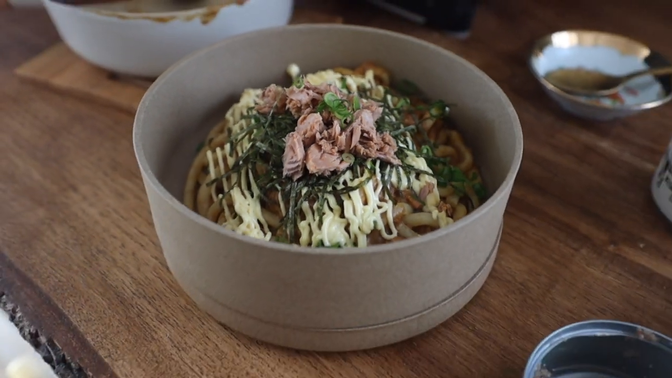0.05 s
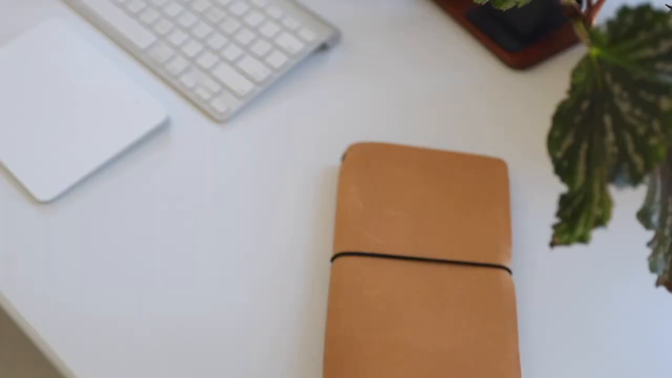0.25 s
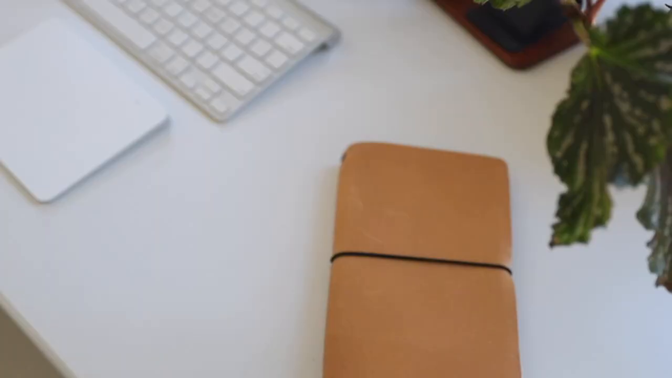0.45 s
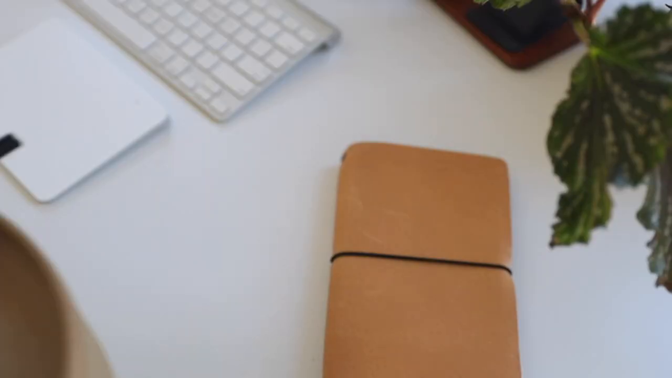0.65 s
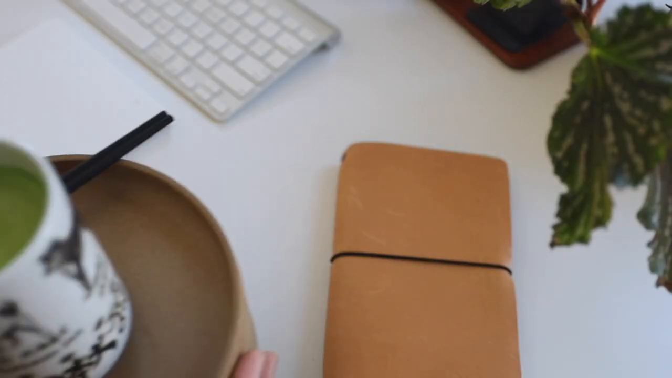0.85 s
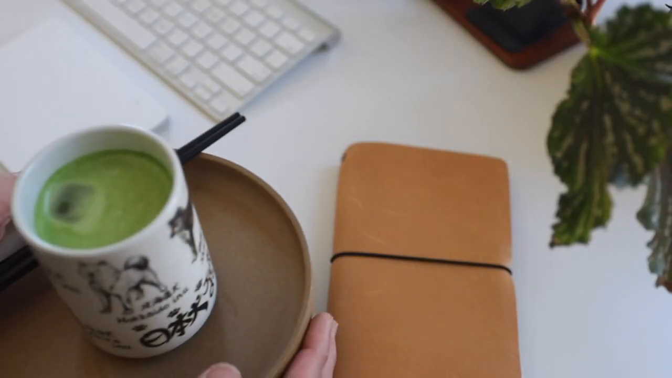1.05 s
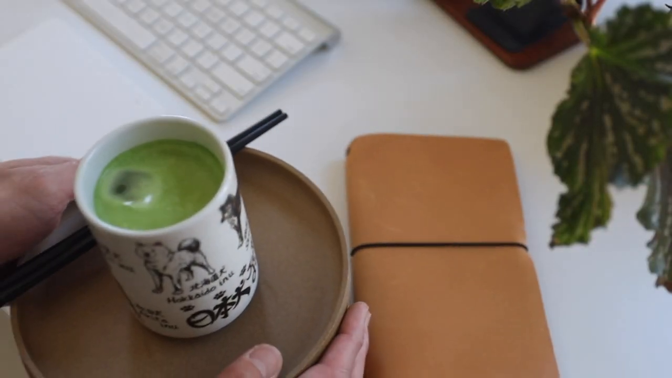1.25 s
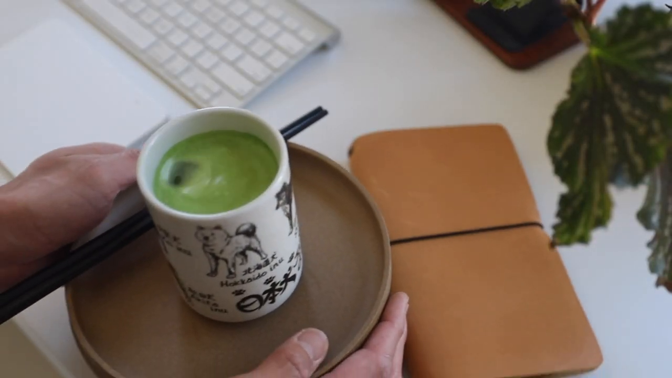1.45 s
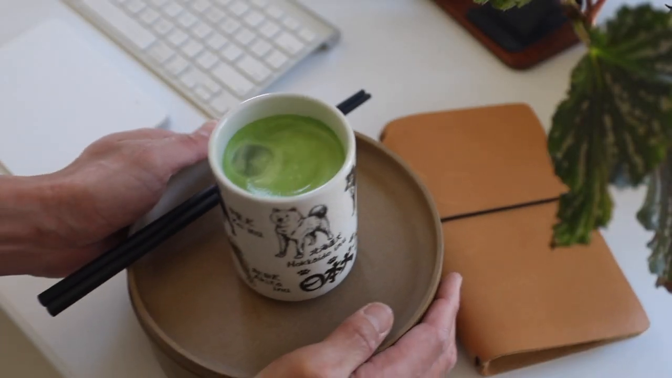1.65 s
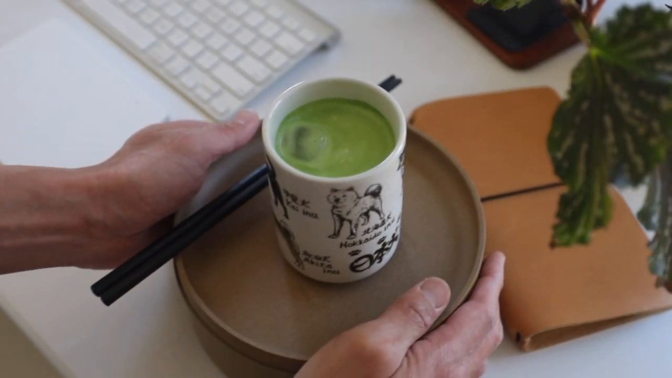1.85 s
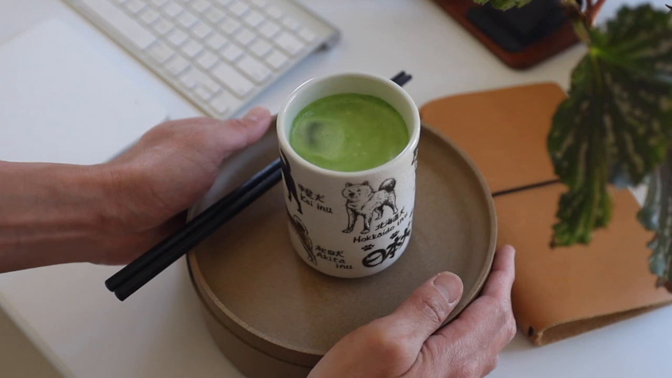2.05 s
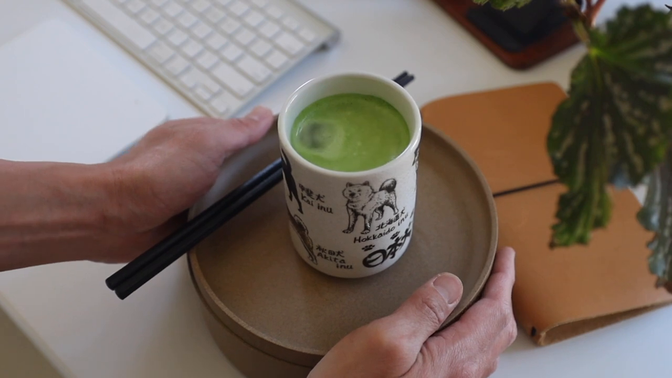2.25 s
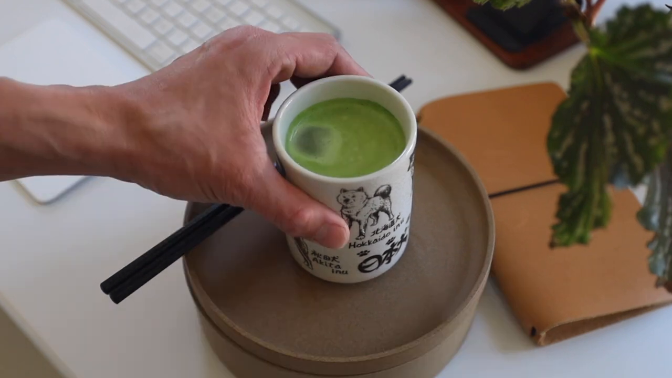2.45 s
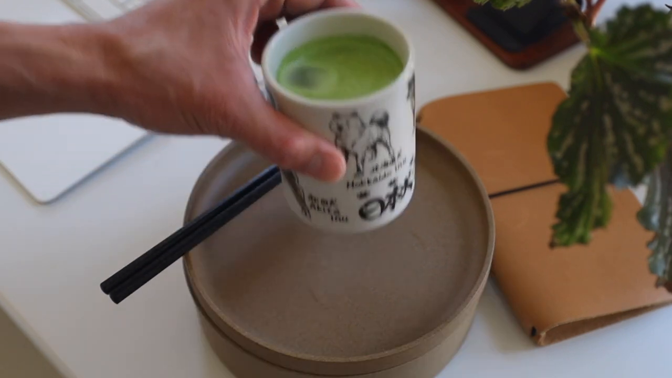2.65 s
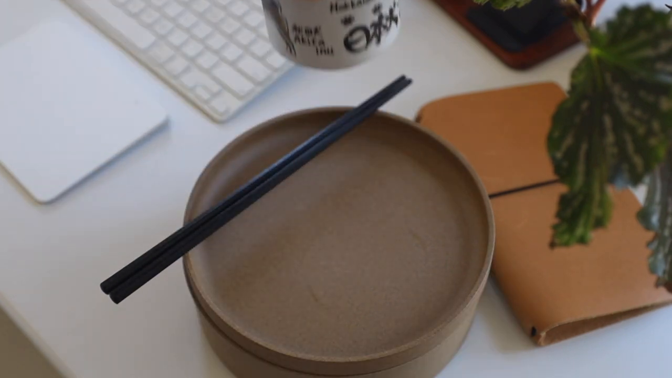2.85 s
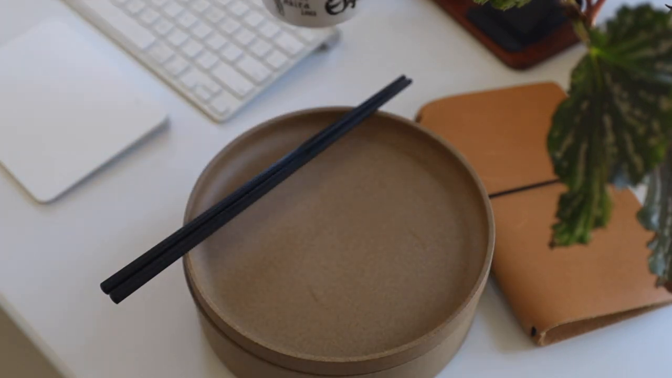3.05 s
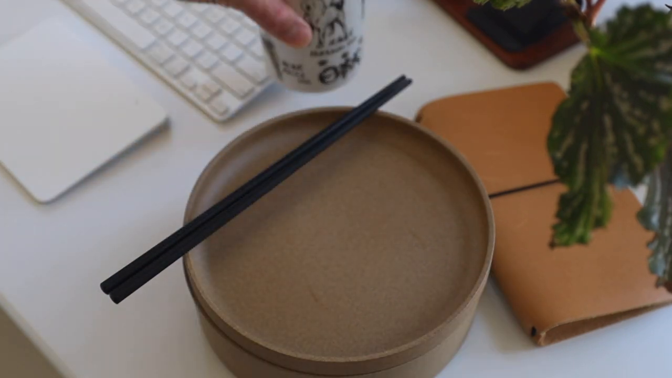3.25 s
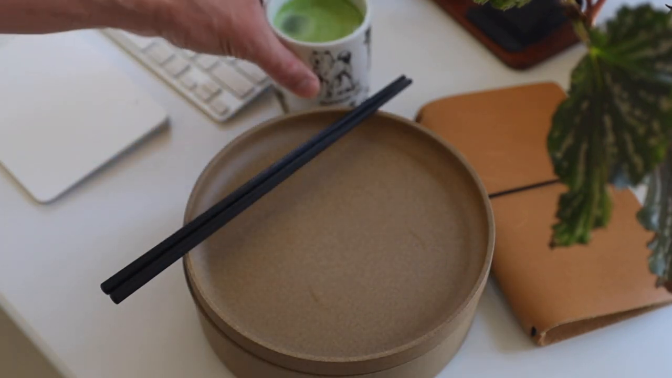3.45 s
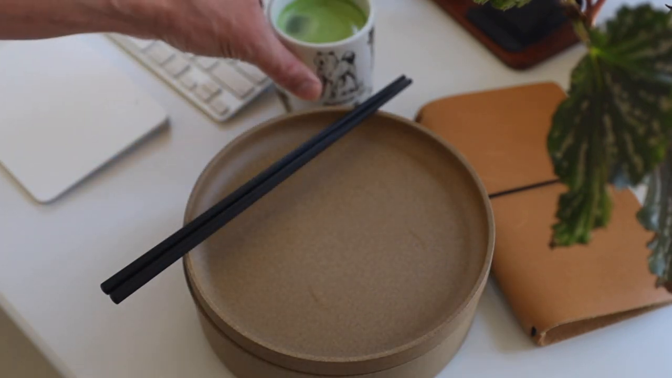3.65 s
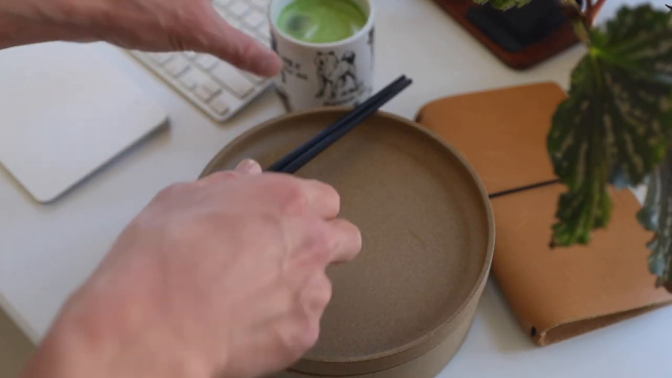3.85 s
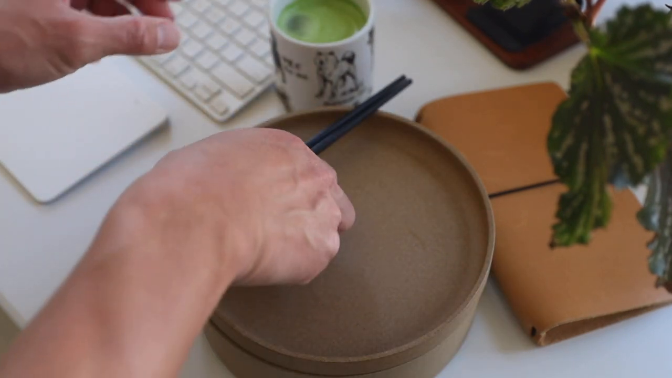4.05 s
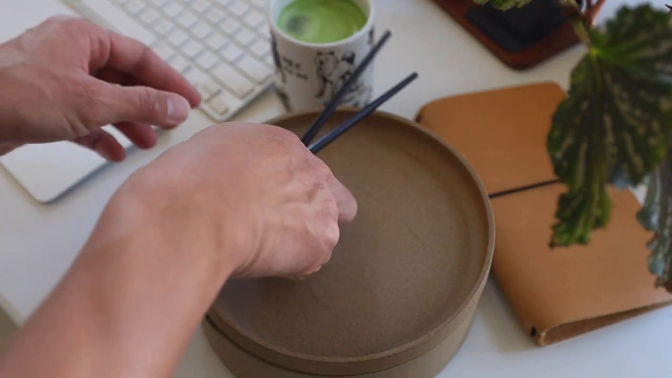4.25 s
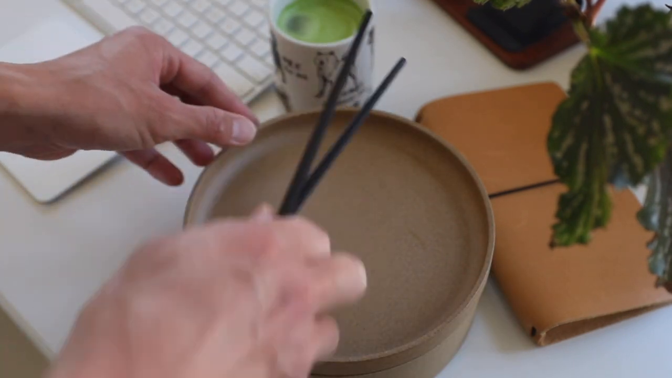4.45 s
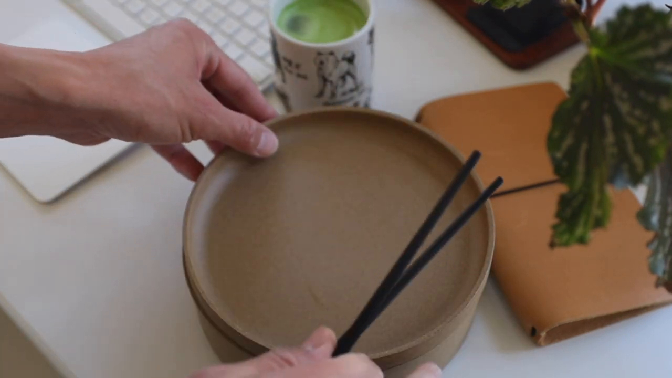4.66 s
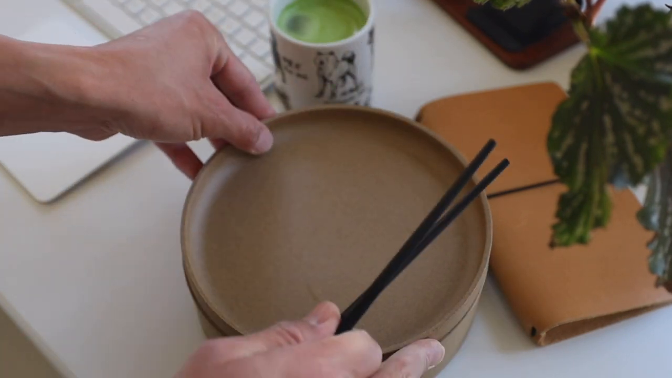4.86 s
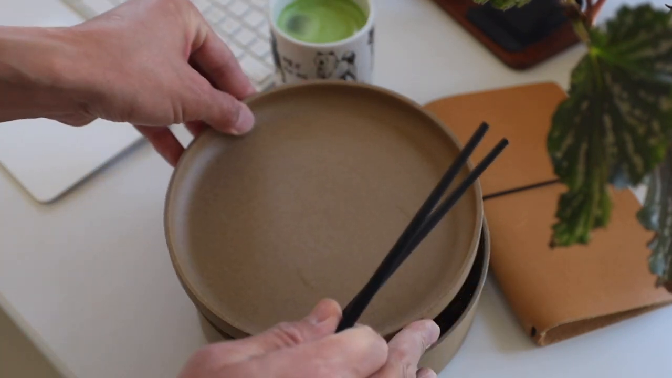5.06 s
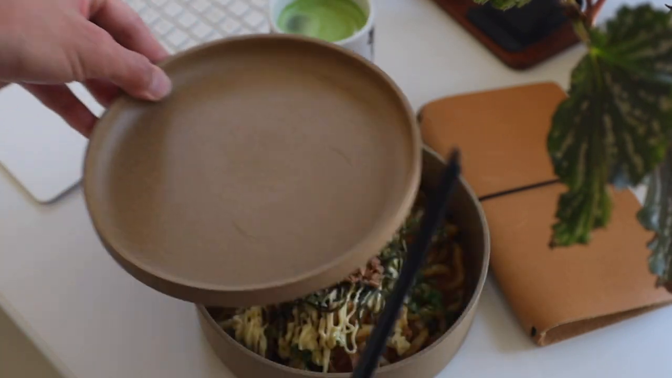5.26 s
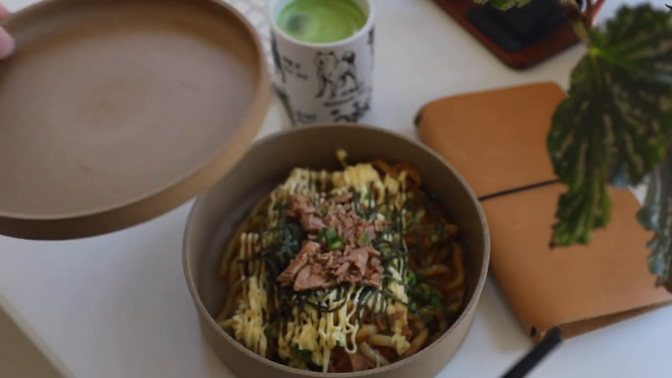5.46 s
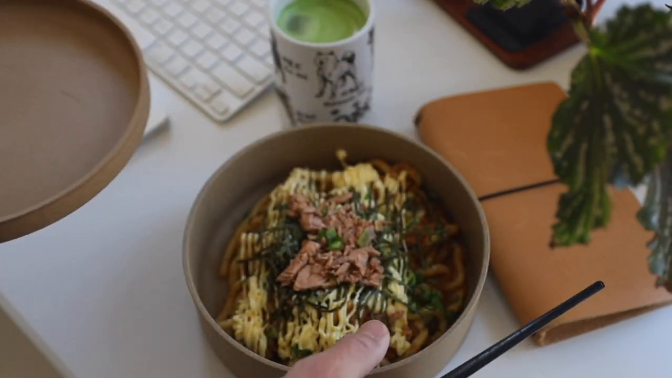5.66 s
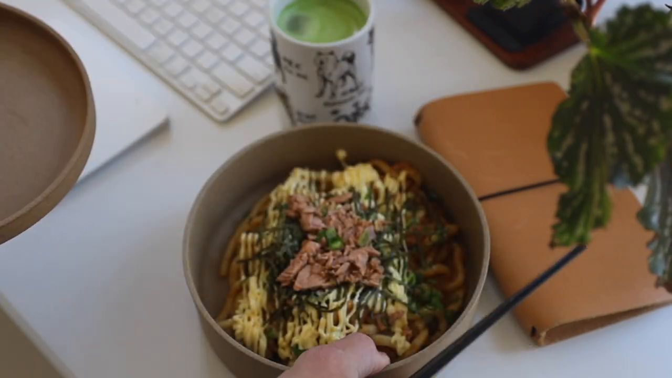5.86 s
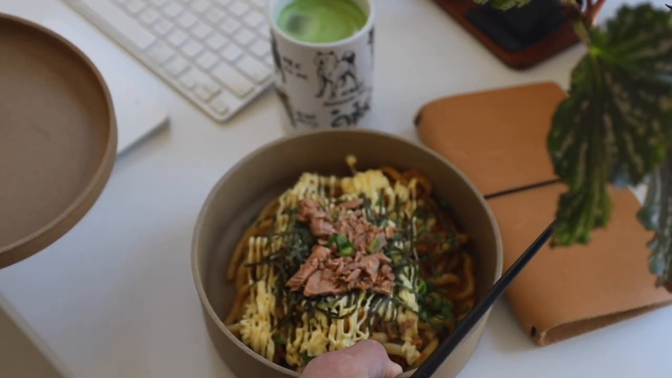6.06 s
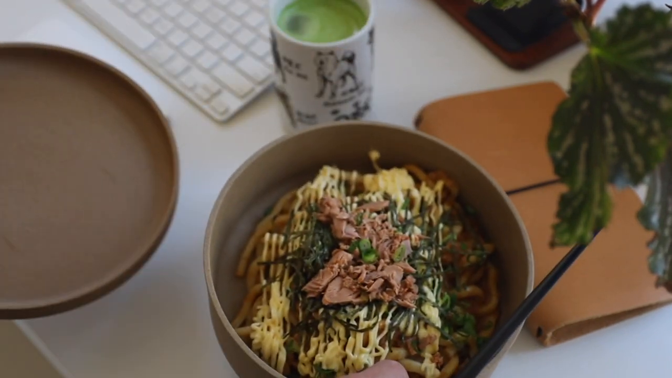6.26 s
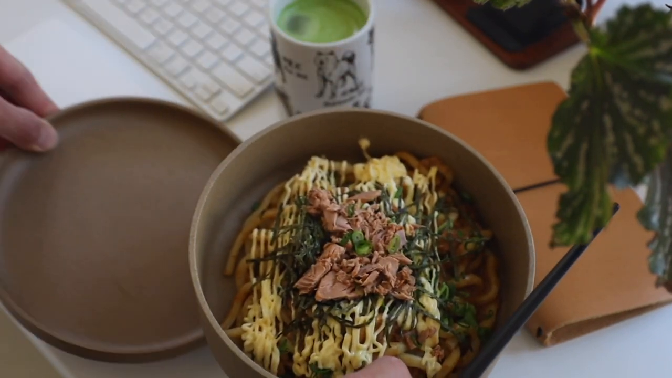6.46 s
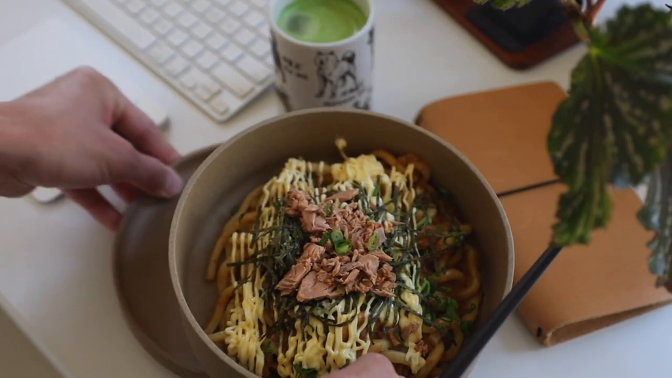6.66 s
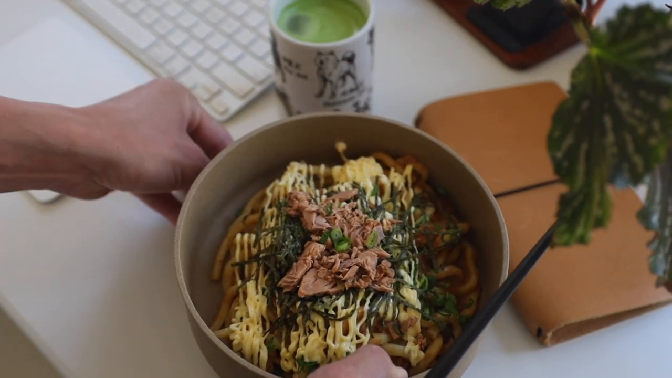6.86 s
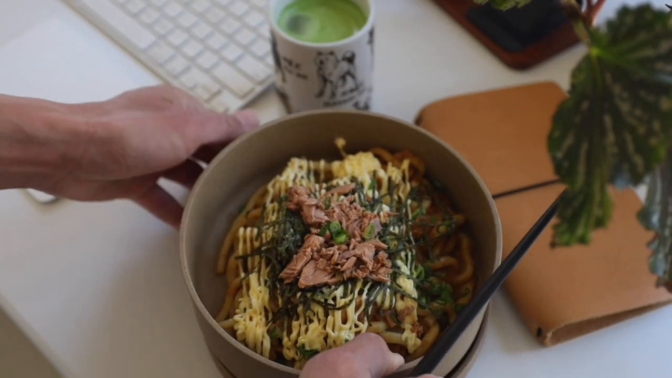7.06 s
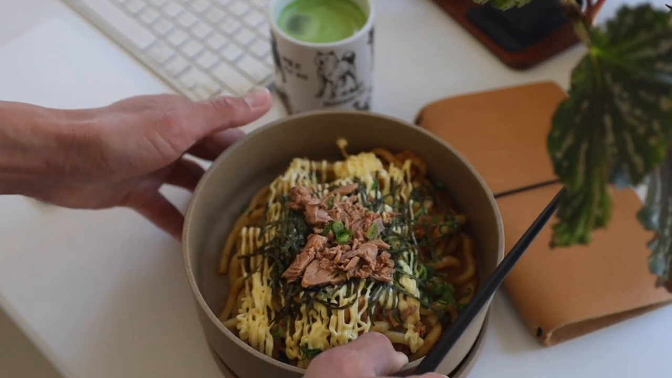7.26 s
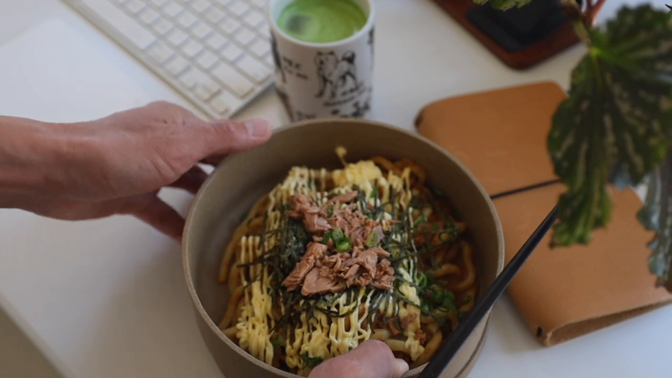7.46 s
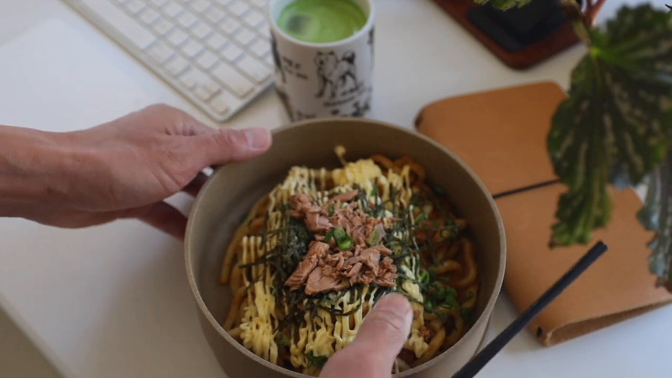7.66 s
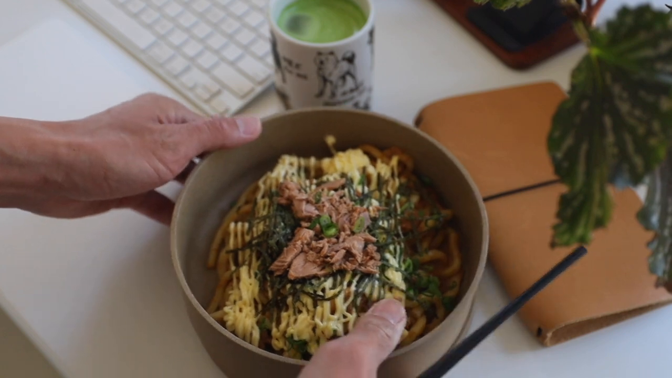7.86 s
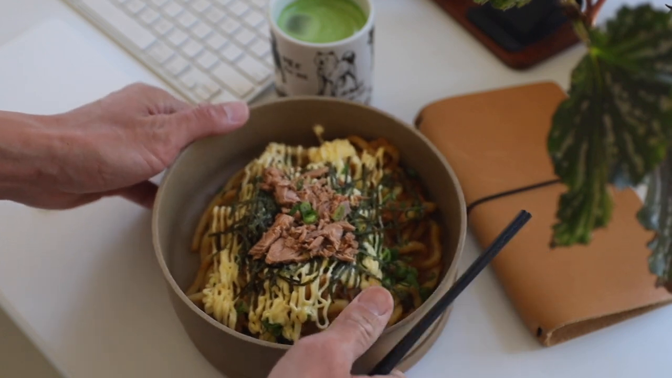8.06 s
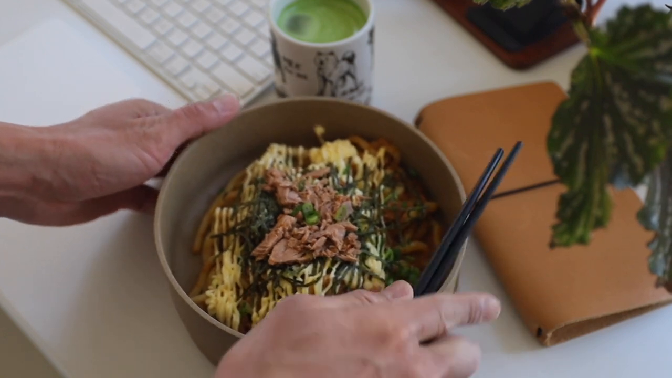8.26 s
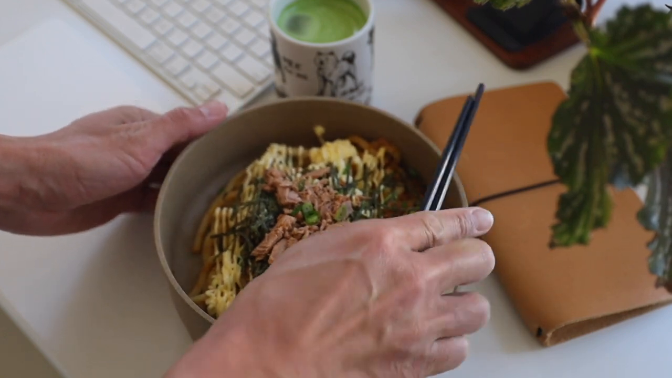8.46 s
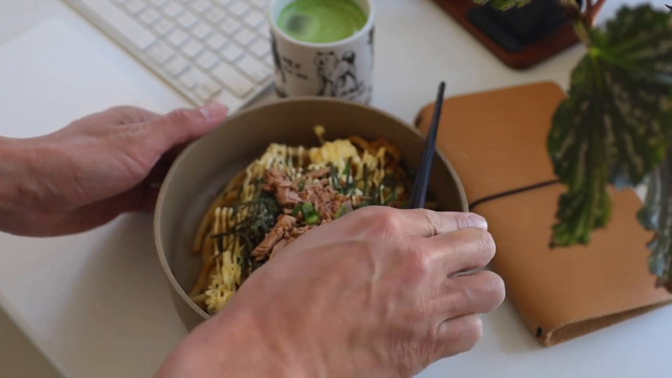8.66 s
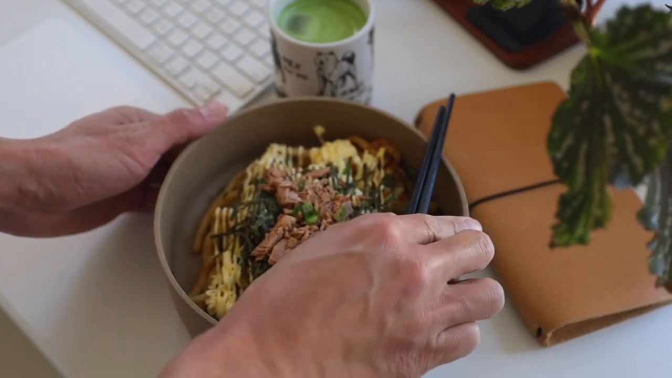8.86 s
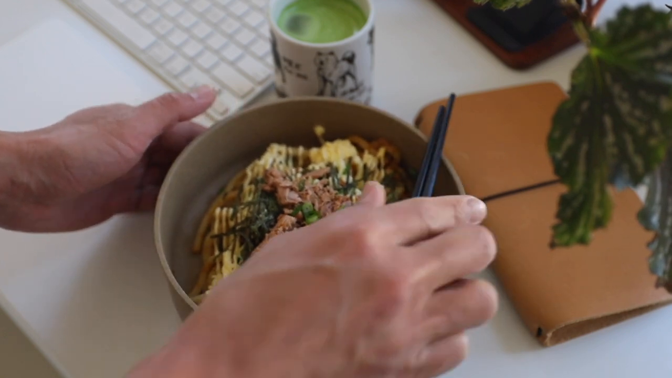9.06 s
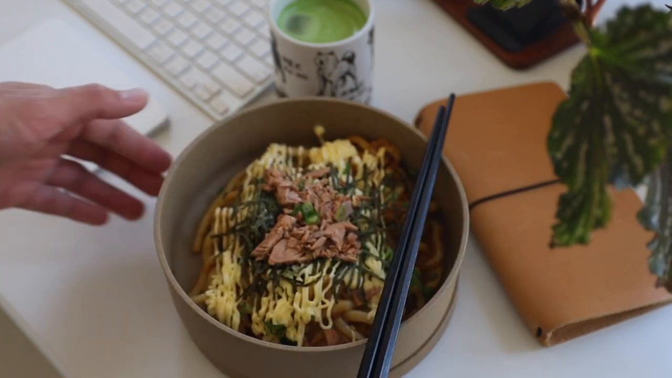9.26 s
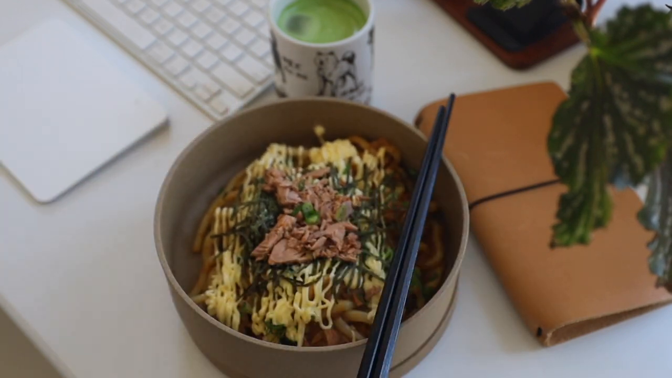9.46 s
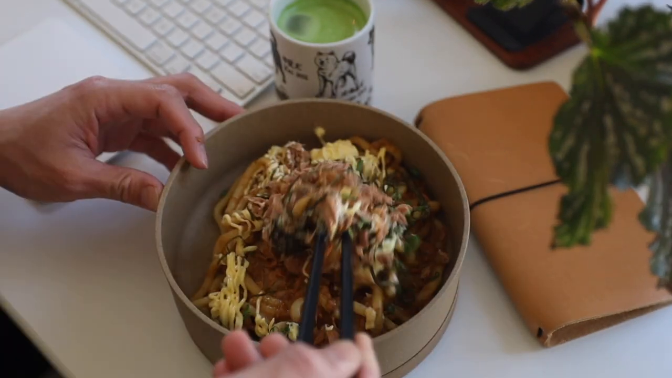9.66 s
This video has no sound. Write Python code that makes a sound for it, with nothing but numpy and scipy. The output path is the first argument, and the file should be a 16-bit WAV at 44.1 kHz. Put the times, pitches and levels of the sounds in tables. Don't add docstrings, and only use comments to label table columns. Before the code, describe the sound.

Close dull knocks and drags of a stoneware box, cup and lid on a desk, with bright chopstick taps and faint sticky ticks over soft fan air.

```python
import sys
import numpy as np
from scipy import signal
from scipy.fft import rfft, irfft, next_fast_len
from scipy.io import wavfile
from scipy.ndimage import uniform_filter1d

SR = 44100
rng = np.random.default_rng(int(sys.argv[2]) if len(sys.argv) > 2 else 0)


def amplitude_ratio(level_db):
    exponent = np.asarray(level_db, float) / 20
    return 10 ** exponent


def to_wav(sig):
    pcm = np.clip(np.atleast_2d(sig), -1, 1) * 32767
    pcm = np.round(pcm).astype(np.int16)
    wavfile.write(sys.argv[1], SR, pcm.T)


N = 427769


def evened(x):
    return x / np.sqrt(np.mean(x ** 2) + 1e-20)


def read(points, hz):
    f, value = np.transpose(points)
    return np.interp(np.log(hz + 1), np.log(f + 1), value)


def add(mix, s, sound):
    part = mix[round(s * SR):][:len(sound)]
    part += sound[:len(part)]


def coloured(x, spectrum):
    size = next_fast_len(len(x))
    gain = amplitude_ratio(read(spectrum, np.fft.rfftfreq(size, 1 / SR)))
    return evened(irfft(rfft(x, size) * gain, size)[:len(x)])


def resonate(x, hz, width_hz):
    turn = np.exp(2j * np.pi * np.cumsum(hz * np.ones(len(x))) / SR)
    r = np.exp(-np.pi * width_hz / SR)
    return 2 * (turn * signal.lfilter([1 - r], [1, -r], x / turn + 1e-18)).real


def ring(modes, favoured_hz, slope_db, sharp):
    hz, width_hz, db = np.transpose(modes)[:, :, None]
    t = np.arange(5000) / SR
    off_pitch = np.sqrt(abs(np.log2(hz / favoured_hz)))
    db = db - slope_db * off_pitch + .8 * rng.standard_normal(db.shape)
    decay = np.exp(-np.pi * width_hz / sharp * t)
    sound = (amplitude_ratio(db) * decay * np.sin(2 * np.pi * hz * t)).sum(0)
    return sound / abs(sound).max()


def grit(count, lump_db, lump_s, slips_per_s, slip):
    lumps = evened(uniform_filter1d(rng.standard_normal(count), max(round(lump_s * SR), 1)))
    size = np.minimum(rng.exponential(slip, count), 2 * slip)
    slips = (rng.random(count) < slips_per_s / SR) * size
    return (1 + slips) * rng.standard_normal(count) * amplitude_ratio(lump_db * lumps)


# f/Hz, level/dB per Hz
KITCHEN_AIR = [(12, -35.5), (20, -11), (46, 1.5), (120, -12), (216, -13.5), (347, -19.5), (4180, -43),
               (8410, -41.5), (16000, -47)]
STUDY_AIR = [(12, -42), (20, -11), (68, -3.5), (182, -9.5), (485, -11.5), (660, -13.5), (718, -11.5),
             (1120, -15), (1330, -7.5), (1910, -20), (2820, -23.5), (3840, -30), (16000, -35)]
# f/Hz, width/Hz, rms level/dB
FAN = [(1345, 30, -53), (2879.1, 270.8, -61), (55.57, 19.35, -60), (4959.4, 160, -77.5)]


def rooms():
    kitchen = amplitude_ratio(-46.5) * coloured(rng.standard_normal(N), KITCHEN_AIR)
    study = amplitude_ratio(-47.5) * coloured(grit(N, lump_db=.3, lump_s=.1, slips_per_s=0, slip=0), STUDY_AIR)
    for hz, width_hz, db in FAN:
        drift = evened(uniform_filter1d(rng.standard_normal(N), round(.2 * SR)))
        whine = resonate(rng.standard_normal(N), hz * (1 + .008 * drift), width_hz)
        study += amplitude_ratio(db + 2.5 * drift) * evened(whine)
    cut_s = .29
    return np.where(np.arange(N) / SR < cut_s, kitchen, study)


# f/Hz, width/Hz, level/dB
BOX = [(283, 19, -55), (337.4, 8.2, -15), (387.76, 27, -7), (468.72, 43, -15.5), (663.23, 28, -3),
       (797.54, 197.2, 5), (991.02, 32.77, 6), (1125.6, 630, 6), (1310, 700, 10.5), (1617.8, 307.3, 13),
       (1988.9, 401.8, 11), (2222.9, 475, 9.5)]
# f/Hz, level/dB per Hz
SCRAPE = [(60, -51), (150, -18), (280, 5.5), (600, 2), (1200, 1), (2200, -10.5), (4000, -20.5),
          (8000, -87.5), (15000, -138)]
HISS = [(1060, -45), (1800, -1.5), (2300, 14), (3610, 3), (7840, -7.5), (8520, -4), (14700, -30.5),
        (16000, -10)]


def slide(rows, bodies, favoured_hz, tone, focus_db=16.5, lean_db=11):
    s, *columns = np.transpose(rows)
    t = np.arange(s[0], s[-1], 1 / SR)
    box_db, hz, hiss_db, ring_db = (np.interp(t, s, c) for c in columns)
    force = grit(len(t), lump_db=2.5, lump_s=.008, slips_per_s=300, slip=2.5)
    walls = ring(BOX, hz.mean(), slope_db=7.5, sharp=0.2981)
    hollow = evened(signal.oaconvolve(force, walls)[:len(t)])
    box = evened(coloured(force, SCRAPE) + 0.32866 * hollow + tone * evened(resonate(force, hz, 47)))
    leaning = [(f, db - lean_db * abs(np.log2(f / max(favoured_hz, 5000)))) for f, db in HISS]
    hiss = coloured(grit(len(t), lump_db=2, lump_s=.005, slips_per_s=200, slip=2.5), leaning)
    rub = evened(grit(len(t), lump_db=3, lump_s=.012, slips_per_s=80, slip=4.))
    rings = sum(amplitude_ratio(db) * ring(body, favoured_hz, slope_db=focus_db, sharp=1.0) for body, db in bodies)
    rung = signal.oaconvolve(rub, rings)[:len(t)]
    sound = amplitude_ratio(box_db - 4.5) * box + amplitude_ratio(hiss_db - 4.0) * hiss + amplitude_ratio(ring_db - 13.0) * rung
    return s[0], sound * signal.windows.tukey(len(t), .004 / (s[-1] - s[0]))


def stroke(peak_s, rise_s, hold_s, db, hard_db, hz, hiss_db, ring_db, sag_db_s, fall_db_s, **contact):
    rise_s, hold_s = max(rise_s, .003), max(hold_s, .001)
    rise_db, tail_db = 36, 47.5
    t = np.arange(-rise_s, hold_s + tail_db / fall_db_s, .002)
    swell = -rise_db * (np.minimum(t, 0) / rise_s) ** 2
    press = swell - sag_db_s * np.clip(t, 0, hold_s) - fall_db_s * np.maximum(t - hold_s, 0)
    pitch = hz * 2 ** (.02 * press)
    hiss = db + hard_db + hiss_db + 1.7378 * press
    rung = db + hard_db + ring_db + 1.3284 * press
    return slide(np.transpose([peak_s + t, db + press, pitch, hiss, rung]), **contact)


def strokes(table, **kind):
    mix = np.zeros(N)
    for row in table:
        add(mix, *stroke(*row, **kind))
    return mix


# f/Hz, width/Hz, level/dB
STICK_A = [(2630, 60, -5), (3660, 45, 0), (4850, 45, -2), (6190, 26, 0), (7720, 30, -2), (9480, 34, -3),
           (11350, 40, -8), (13400, 40, -6), (15500, 45, -11)]
# peak t/s, rise/s, hold/s, pressure level/dB, hardness/dB
CARRIES = [
    (.45, 0.14505, 0.2175, -58.5, 2),
    (.68, 0.07412, 0.2814, -47.5, 0.5),
    (1.085, .06, 0.00588, -39.5, -4.5),
]


def carries():
    return strokes(CARRIES, hz=659.4, hiss_db=2.5, ring_db=-12.5, sag_db_s=15, fall_db_s=150.5,
                   bodies=[(STICK_A, 0)], favoured_hz=5940, tone=0.1796)


# peak t/s, rise/s, hold/s, pressure level/dB, hardness/dB
JOSTLES = [
    (1.116, .008, 0.0124, -25.5, 0),
    (1.14, .02, 0.00711, -22, 0),
]


def jostles():
    return strokes(JOSTLES, hz=1850, hiss_db=-7, ring_db=-15, sag_db_s=30, fall_db_s=282.5,
                   bodies=[(STICK_A, 0)], favoured_hz=4000, tone=0.7433, focus_db=-3)


# t/s, peak level/dB, f/Hz, t60/s
BOOMS = [(1.379, -23, 354, 0.0993), (1.409, -20.5, 334.7, 0.0701), (4.812, -20, 323.7, 0.2097),
         (4.821, -17.5, 883.7, 0.1024), (4.933, -16.5, 425.5, 0.1003), (4.953, -19, 419, 0.0709),
         (4.993, -18.5, 540, 0.0716), (5.0, -24, 311.3, 0.1136), (6.785, -13.5, 381.3, 0.1368),
         (6.83, -15, 361.5, 0.1575), (6.87, -15.5, 376.3, 0.142), (6.849, -9.5, 1338, 0.06608),
         (6.768, -9, 1310, 0.07594), (8.787, -12, 900, 0.0309), (1.4985, -6.5, 1112, 0.07813),
         (1.499, -7.5, 476.6, 0.07064), (1.662, -5, 1355, 0.0342), (3.485, -7.5, 1052, 0.07613),
         (3.485, -9, 518.8, 0.0928), (6.5625, -6, 952.2, 0.06588), (6.563, -9, 399.7, 0.0997),
         (6.927, -10, 1298, 0.07186), (6.927, -10.5, 2105, 0.0559), (7.143, -8, 762.8, 0.0851),
         (7.433, -17.5, 697.8, 0.0721), (1.117, -25.5, 803.7, 0.0525), (1.136, -21.5, 750.6, 0.0708),
         (7.542, -28.5, 607.2, 0.0517), (1.582, -18.5, 697, .05)]


def booms():
    mix = np.zeros(N)
    for s, db, hz, t60 in BOOMS:
        t = np.arange(0, 1.2 * t60, 1 / SR)
        swell = np.minimum(t * hz / 1.2324, 1)
        add(mix, s, swell * amplitude_ratio(db - 60 * t / t60) * np.sin(2 * np.pi * hz * t))
    return mix


# peak t/s, rise/s, hold/s, pressure level/dB, hardness/dB
DRAGS = [
    (1.22, 0.0557, 0.1178, -35, 15.5),
    (1.346, 0.009597, 0.28, -38, 21.5),
    (1.515, 0.006111, 0.24, -11, -1.5),
    (1.655, 0.021793, 0.00451, -15, 11.5),
    (1.68, 0.0055666, 0.2327, -13.5, 0),
    (2.455, 0.05282, 0.02595, -35.5, 13),
    (6.74, .13, 0.0596, -31.5, 6.5),
    (7.46, 0.005268, 0.0104, -23, -11.5),
    (9.004, .01, 0.00494, -42.5, 19),
]


def drags():
    return strokes(DRAGS, hz=553.46, hiss_db=-21.5, ring_db=-46, sag_db_s=45.5, fall_db_s=116.5,
                   bodies=[(STICK_A, 0)], favoured_hz=5500, tone=0.1939)


def tap(s, click_db, favoured_hz, *ring_db, bodies):
    t = np.arange(5000) / SR
    burst = rng.standard_normal(len(t)) * (np.exp(-t / .0008) + .12 * np.exp(-t / .006))
    crack = np.diff(burst, prepend=0)
    for _ in range(3):
        crack = resonate(crack, favoured_hz, 0.5 * favoured_hz)
    sound = amplitude_ratio(click_db) * crack / abs(crack).max()
    for db, body in zip(ring_db, bodies):
        sound += amplitude_ratio(db + 12) * ring(body, favoured_hz, slope_db=11., sharp=.7)
    return s, sound


def taps(table, *bodies):
    mix = np.zeros(N)
    for row in table:
        levels_db = (row[-1], row[-1] - 15.5)[:len(bodies)]
        add(mix, *tap(*row[:3], *levels_db, bodies=bodies))
    return mix


# f/Hz, width/Hz, level/dB
STICK_B = [(2680, 120, -2), (3670, 65, -2), (5070, 90, 1), (6680, 42, 0), (8110, 45, -2), (8450, 60, -1),
           (10280, 120, -2), (12050, 70, -8), (12600, 75, -6), (14250, 90, -10), (14800, 120, -10)]
# t/s, click level/dB, favoured f/Hz, ring level/dB
TAPS_B = [
    (1.257, -36.5, 6680, -43),
    (4.2155, -19.5, 4983, -28),
    (4.2554, -36, 8352, -31.5),
    (8.2313, -33, 8100, -41),
    (8.292, -34, 7000, -38),
    (8.6290, -22, 2680, -27),
    (8.6732, -8.5, 2680, -18.5),
    (8.6828, -19.5, 8110, -14.5),
    (8.7674, -27, 5965, -8.5),
    (8.7951, -21.5, 6680, -18.5),
]


def taps_b():
    return taps(TAPS_B, STICK_B, STICK_A)


# f/Hz, width/Hz, level/dB
STICKS_ON_LID = [(2000, 45, 0), (3400, 40, -2), (4820, 35, -6), (5100, 35, 0), (7880, 30, 0),
                 (9600, 36, -8), (11400, 36, -14), (12700, 58, -12), (13400, 59, -11)]
# t/s, click level/dB, favoured f/Hz, ring level/dB
TAPS_ON_LID = [
    (1.3497, -38.5, 2600, -31),
    (1.3649, -33.5, 7880, -40),
    (1.411, -29.5, 3240, -40),
    (2.403, -38.5, 5100, -46.5),
    (2.4135, -30, 9000, -36),
]


def taps_on_lid():
    return taps(TAPS_ON_LID, STICKS_ON_LID)


def knock(s, db, hz, t60, push_db):
    damped = [(f, 2.2 / t60, level) for f, _, level in [*BOX, (hz, 0, 8)]]
    contact = np.hanning(round(.45 * SR / hz) + 3)
    walls = np.convolve(ring(damped, hz, slope_db=8.0, sharp=0.93), contact)
    radiated = signal.sosfilt(signal.butter(2, 210, "high", fs=SR, output="sos"), walls)
    t = np.arange(len(walls)) / SR
    push = np.sin(2 * np.pi * 55 * t) * np.exp(-t / 0.0267)
    sound = amplitude_ratio(db + 3.0) * radiated / abs(radiated).max() + amplitude_ratio(db + push_db + 3) * push
    return s + 0.0010384, sound


def blows(table, push_db):
    mix = np.zeros(N)
    for row in table:
        add(mix, *knock(*row, push_db))
    return mix


# t/s, peak level/dB, f/Hz, t60/s
KNOCKS = [(1.390, -14, 777, 0.02843), (3.484, 1, 722.5, 0.02868), (4.271, -12, 1697, 0.03242),
          (6.063, -20, 297.9, 0.01443), (6.926, -1, 880.8, 0.0669), (7.142, 0, 864.2, 0.0254),
          (7.431, -9, 720, 0.0906), (7.443, -2.5, 675.7, 0.00776), (7.446, -5.5, 2193, 0.01696),
          (8.628, -13, 2355, 0.03817), (8.673, -12, 2659, 0.04742), (8.767, -13.5, 1462, 0.06737)]


def lid_knocks():
    return blows(KNOCKS, push_db=-56)


# t/s, peak level/dB, f/Hz, t60/s
THUMPS = [(1.498, -1, 1132, 0.02287), (1.579, -16, 425.9, 0.1497), (1.661, 0, 900, 0.01933),
          (2.449, -16.5, 1850, 0.00792), (3.685, -19, 292.8, 0.0903), (3.714, -33, 267.4, 0.0226),
          (6.016, -29.5, 285.6, 0.2074), (6.561, -1.5, 956.5, 0.02283), (6.605, -4.5, 900, 0.02613),
          (6.622, -9.5, 692.8, 0.01987), (7.337, -21, 804, 0.0381), (7.541, -18, 601.6, 0.03394),
          (8.174, -18.5, 1933, 0.0273), (9.001, -22.5, 1310, 0.01766)]


def desk_thumps():
    return blows(THUMPS, push_db=-31.5)


# t/s, click level/dB, favoured f/Hz, ring level/dB
TAPS_A = [
    (1.4985, -15.5, 4190, -32),
    (1.6634, -5, 3716, -28.5),
    (4.9931, -36.5, 5730, -44.5),
    (5.7107, -44, 4730, -44.5),
    (5.766, -40, 3660, -53),
    (8.1773, -8.5, 3740, -26),
    (8.364, -48, 6190, -34),
    (8.385, -46, 5500, -42),
]


def taps_a():
    return taps(TAPS_A, STICK_A, STICK_B)


# f/Hz, width/Hz, level/dB
FOOT = [(3560, 36, -1), (4820, 28, -4), (5820, 24, -3), (6850, 30, -13), (8070, 30, -6), (8300, 45, -7)]
# t/s, click level/dB, favoured f/Hz, ring level/dB
LANDINGS = [
    (3.4876, -26, 5189, -20),
    (7.1435, -16.5, 3300, -30),
    (4.2726, -26, 3900, -28),
]


def landings():
    return taps(LANDINGS, FOOT)


# peak t/s, rise/s, hold/s, pressure level/dB, hardness/dB
SETTLES = [
    (3.51, 0.006452, 0.09556, -12.5, 2.5),
    (3.72, 0.03022, 0.1025, -39, -9.5),
    (7.17, .006, 0.01006, -19, 2.5),
    (7.338, .01, 0.0103, -42, 16),
]


def settles():
    return strokes(SETTLES, hz=590.37, hiss_db=-25, ring_db=-26, sag_db_s=55, fall_db_s=156,
                   bodies=[(FOOT, 0)], favoured_hz=3540, tone=0.3993, focus_db=12)


# f/Hz, width/Hz, level/dB
CUP = [(1325, 36, -2), (1780, 26, -1), (3230, 32, -2), (5850, 40, -12), (6830, 30, -11), (8060, 40, -13),
       (9320, 33, -14), (12300, 40, -16)]
# peak t/s, rise/s, hold/s, pressure level/dB, hardness/dB
PICKUPS = [
    (4.19, 0.02365, 0.02097, -27, -3),
    (4.232, 0.03762, 0.002658, -24, 2.5),
]


def pickups():
    return strokes(PICKUPS, hz=720, hiss_db=-11, ring_db=-9.5, sag_db_s=-8, fall_db_s=212.5,
                   bodies=[(CUP, 0), (FOOT, -2.605), (STICK_B, -18)], favoured_hz=2257.8, tone=0.153)


# f/Hz, width/Hz, level/dB
LID = [(1510, 90, -4), (1800, 60, 0), (2630, 60, -4), (3330, 55, -3), (3770, 90, -7), (4860, 70, -4),
       (6140, 70, -9), (7720, 28, -10), (8270, 38, -16), (9540, 30, -12), (13400, 36, -12)]
# peak t/s, rise/s, hold/s, pressure level/dB, hardness/dB
LIFTS = [
    (4.785, 0.03602, 0.01518, -46, 9),
    (4.818, 0.017965, 0.02028, -15.5, 0),
    (4.938, .02, 0.0613, -31.5, -2.5),
]


def lifts():
    return strokes(LIFTS, hz=439.46, hiss_db=-14.5, ring_db=-9.5, sag_db_s=49, fall_db_s=136,
                   bodies=[(LID, 0)], favoured_hz=1800, tone=0.3173, focus_db=3.5)


# f/Hz, width/Hz, level/dB
TIPS = [(3670, 60, -16), (5070, 110, -8), (6680, 110, -2), (8450, 150, 0), (10280, 170, -1),
        (12600, 150, 0), (14800, 170, -2)]
# t/s, click level/dB, favoured f/Hz, ring level/dB
FLICKS = [(5.293, -40, 7000, -43), (5.3160, -6.5, 11000, -14.5), (5.385, -30.5, 8450, -33.5),
          (5.394, -29.5, 7500, -36), (8.650, -32.5, 9000, -39.5), (8.659, -30, 12000, -32),
          (8.6815, -18.5, 10300, -10.5), (8.698, -30, 8450, -21), (8.713, -30, 8450, -19),
          (8.8223, -31, 14000, -37), (8.832, -34.5, 14000, -38.5)]


def flicks():
    return taps(FLICKS, TIPS)


# peak t/s, rise/s, hold/s, pressure level/dB, hardness/dB
SWIPES = [
    (5.325, 0.0066, 0.0303, -68, 0.00015),
    (5.39, 0.044, 0.00932, -69, 0.000097),
]


def swipes():
    return strokes(SWIPES, hz=580, hiss_db=36.5, ring_db=32, sag_db_s=28, fall_db_s=200,
                   bodies=[(TIPS, 0)], lean_db=15, favoured_hz=9000, tone=.3)


# f/Hz, width/Hz, level/dB
RIM = [(4500, 200, -8), (5780, 65, 0), (6100, 200, -3), (7300, 90, -5), (8330, 70, -5)]
# peak t/s, rise/s, hold/s, pressure level/dB, hardness/dB
WIPES = [
    (5.475, .01, 0.00506, -64.5, 0),
    (5.52, 0.028, 0.0141, -74, 0.000066),
    (7.56, 0.059, 0.02607, -78.5, 0),
]


def wipes():
    return strokes(WIPES, hz=580, hiss_db=24.5, ring_db=26.5, sag_db_s=32, fall_db_s=160.5,
                   bodies=[(RIM, 0), (TIPS, -5)], lean_db=22, favoured_hz=6000, tone=.3)


# t/s, click level/dB, favoured f/Hz, ring level/dB
PINGS = [
    (5.468, -35, 5780, -42),
    (5.4805, -22.5, 7020, -41),
    (5.4878, -25, 5940, -30),
    (5.4945, -26, 5893, -36.5),
    (5.5055, -20, 7025, -38.5),
    (5.516, -28.5, 5790, -38.5),
    (5.5200, -16.5, 5827, -31),
    (7.3392, -46, 5780, -38),
    (7.4331, -30, 5860, -29),
    (7.519, -50, 5817, -36),
]


def pings():
    return taps(PINGS, RIM)


# peak t/s, rise/s, hold/s, pressure level/dB, hardness/dB
RATTLES = [
    (5.724, 0.02915, 0.02326, -43, 2.075),
    (5.826, 0.12208, 0.0038, -39, 4.807),
    (7.645, 0.01377, 0.1325, -56, 18.12),
    (8.19, 0.005517, 0.00458, -34.5, 11.06),
    (8.37, 0.013, 0.01021, -44, 21.666),
    (8.58, 0.04597, 0.0457, -54.5, 16.016),
]


def rattles():
    return strokes(RATTLES, hz=494, hiss_db=-18, ring_db=-17.5, sag_db_s=26, fall_db_s=185.5,
                   bodies=[(STICK_A, 0), (STICK_B, -24.5)], favoured_hz=6190, tone=0.12, focus_db=6.5)


# peak t/s, rise/s, hold/s, pressure level/dB, hardness/dB
PUSHES = [
    (6.068, 0.10883, 0.01508, -28.5, -5),
    (7.95, 0.22158, 0.02226, -14, 5.5),
    (9.192, .04, 0.00943, -41, 0.5),
]


def pushes():
    return strokes(PUSHES, hz=576.03, hiss_db=-34.5, ring_db=-59.5, sag_db_s=44.5, fall_db_s=140,
                   bodies=[(LID, 0)], favoured_hz=3000, tone=0.5247)


# t/s, click level/dB, favoured f/Hz, ring level/dB
CLINKS = [
    (6.563, -20, 3230, -34.5),
    (6.9264, -13, 2440, -23),
]


def clinks():
    return taps(CLINKS, CUP)


# peak t/s, rise/s, hold/s, pressure level/dB, hardness/dB
RIM_SLIDES = [
    (6.58, .012, 0.1432, -19, -3.5),
    (6.745, .08, 0.01052, -19, 4.5),
]


def rim_slides():
    return strokes(RIM_SLIDES, hz=720, hiss_db=-14, ring_db=-9, sag_db_s=0, fall_db_s=400,
                   bodies=[(CUP[1:], 0)], favoured_hz=1780, tone=0.1087, focus_db=12.5)


# f/Hz, width/Hz, level/dB
BASE = [(1320, 70, 0), (2140, 70, -14), (2580, 60, -20), (3280, 40, -7), (5820, 45, -22), (6830, 35, -22),
        (8100, 45, -24)]
# peak t/s, rise/s, hold/s, pressure level/dB, hardness/dB
FLAT_SLIDES = [
    (6.765, .045, 0.1709, -17.5, 0.00012),
]


def flat_slides():
    return strokes(FLAT_SLIDES, hz=383.65, hiss_db=-18.5, ring_db=-9.5, sag_db_s=9.5, fall_db_s=302,
                   bodies=[(BASE, 0)], favoured_hz=1320, tone=0.5907, focus_db=7)


# peak t/s, rise/s, hold/s, pressure level/dB, hardness/dB
LEAVES = [
    (6.95, 0.0055, 0.044, -17, 0),
]


def leaves():
    return strokes(LEAVES, hz=900, hiss_db=-14, ring_db=-20, sag_db_s=0, fall_db_s=200,
                   bodies=[(BASE[1:], 0)], favoured_hz=3280, tone=0.2, focus_db=10)


# peak t/s, rise/s, hold/s, pressure level/dB, hardness/dB
STIRS = [
    (8.638, 0.004935, 0.01326, -22.5, -6),
    (8.689, 0.028526, 0.0139, -21.5, 0),
    (8.78, .006, 0.0059, -18.5, -2),
]


def stirs():
    return strokes(STIRS, hz=763, hiss_db=-3, ring_db=3, focus_db=4, sag_db_s=30, fall_db_s=230,
                   bodies=[(STICK_B, 0), (STICK_A, -13)], favoured_hz=5070, tone=0.36)


# t/s, click level/dB, f/Hz
TICKS = [
    (9.575, -36.5, 8143),
    (9.592, -44.5, 13000),
    (9.605, -38, 10980),
    (9.615, -36, 4000),
    (9.651, -39.5, 8786),
]


def sauce_ticks():
    return taps(TICKS)


# f/Hz, t60/s
ROOM = [(100, 0.4918), (500, 0.32258), (2000, 0.34245), (6000, 0.28057), (16000, 0.14166)]


def walls_of_room(x):
    echoes = np.zeros(SR)
    at = np.arange(200, SR - 20, 20) + rng.integers(0, 20, (SR - 201) // 20)
    echoes[at] = rng.choice([-1., 1.], at.shape)
    hz, t, z = signal.stft(echoes, SR, nperseg=256)
    tail = signal.istft(z * amplitude_ratio(-60 * t / read(ROOM, hz)[:, None]), SR, nperseg=256)[1]
    return signal.fftconvolve(x, tail / np.linalg.norm(tail))[:N]


def scene():
    air = rooms()
    hits = booms() + lid_knocks() + desk_thumps()
    hits += taps_b() + taps_on_lid() + taps_a() + landings() + flicks() + pings() + clinks() + sauce_ticks()
    slides = carries() + jostles() + drags() + settles() + pickups() + lifts() + swipes()
    slides += wipes() + rattles() + pushes() + rim_slides() + flat_slides() + leaves() + stirs()
    echo = walls_of_room(amplitude_ratio(-6.5) * hits + amplitude_ratio(-10.5) * slides)
    return (hits + slides + echo + air)[None]


def low_pass(x):
    return signal.sosfilt(signal.butter(12, 16790, fs=SR, output="sos"), x)


def record(dry):
    keep, late = np.exp(-1 / (0.000959 * SR)), round(0.0087 * SR)
    power_db = 10 * np.log10(signal.lfilter([1 - keep], [1, -keep], dry[0] ** 2) + 1e-12)
    fall_db = np.arange(N) * 41.76 / SR
    held_db = np.maximum.accumulate(power_db + fall_db) - fall_db
    over_db = np.maximum(held_db + 16, 0)
    ducked = dry / amplitude_ratio(0.32704 * np.roll(over_db, late))
    clipped = ducked / (1 + ducked ** 16) ** (1 / 16)
    limited = signal.oaconvolve(clipped, signal.firwin(127, 16000, fs=SR)[None], "same")
    return low_pass(limited)


dry = scene()
out = record(dry)
to_wav(out)
```